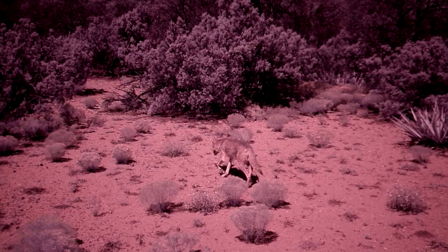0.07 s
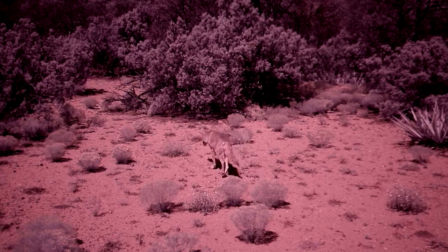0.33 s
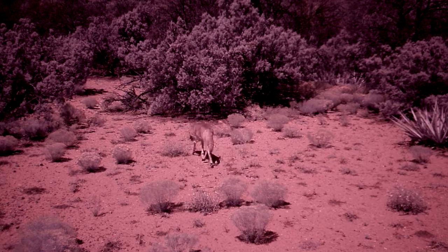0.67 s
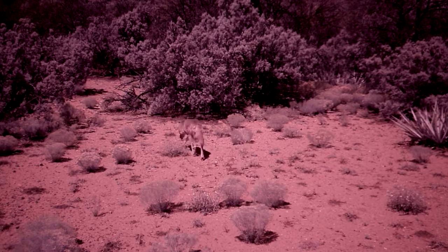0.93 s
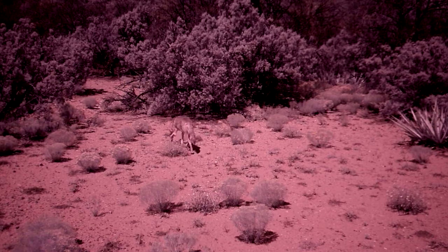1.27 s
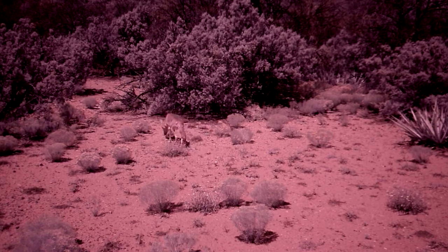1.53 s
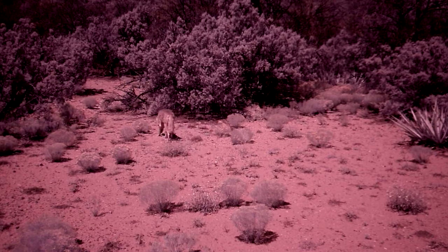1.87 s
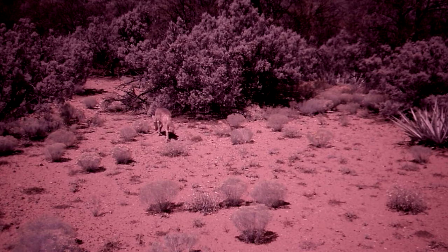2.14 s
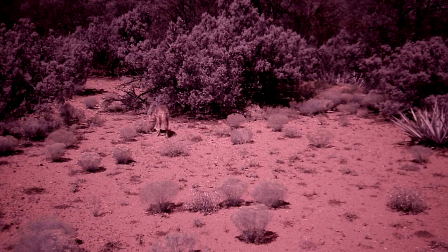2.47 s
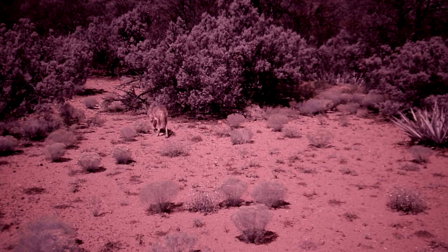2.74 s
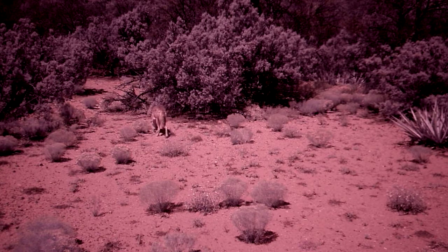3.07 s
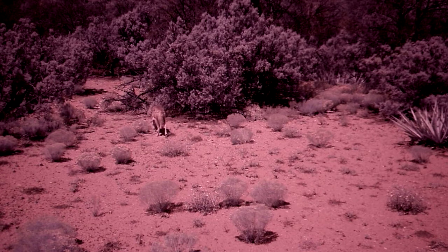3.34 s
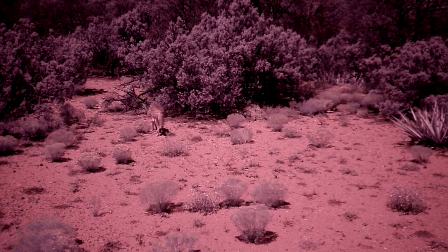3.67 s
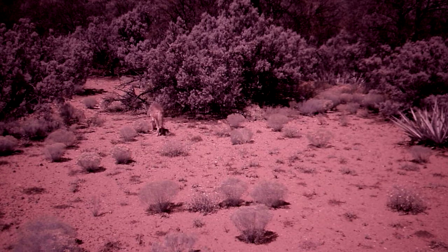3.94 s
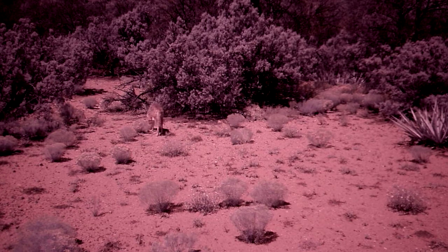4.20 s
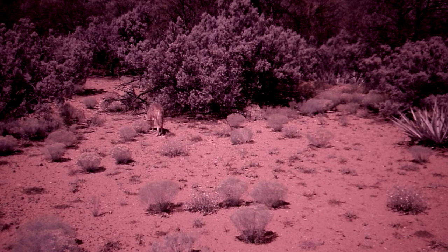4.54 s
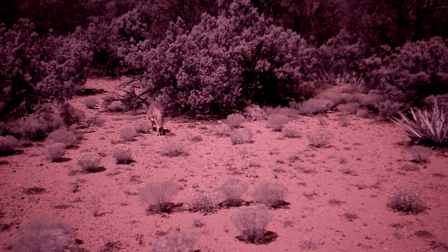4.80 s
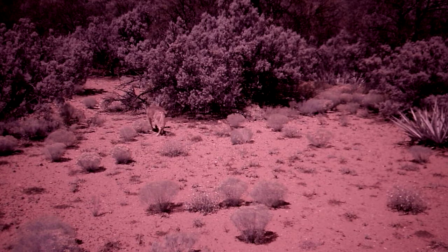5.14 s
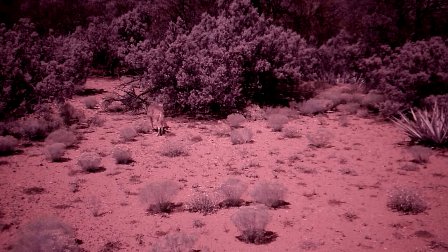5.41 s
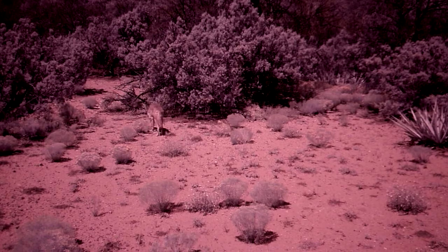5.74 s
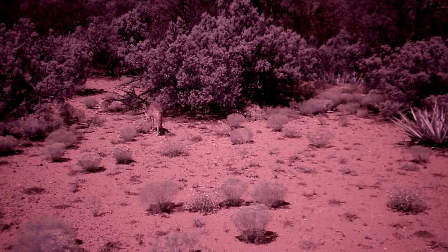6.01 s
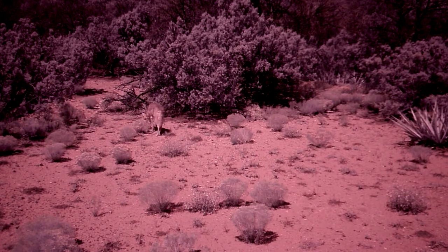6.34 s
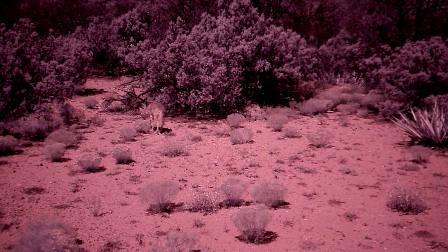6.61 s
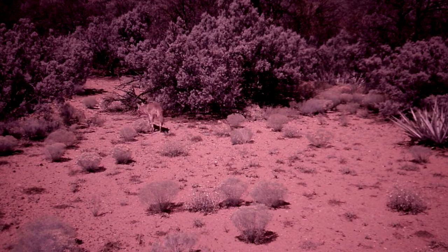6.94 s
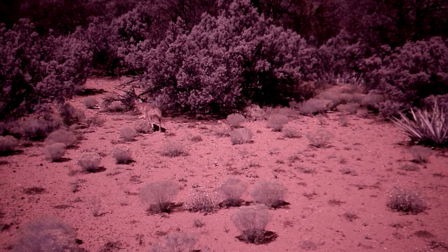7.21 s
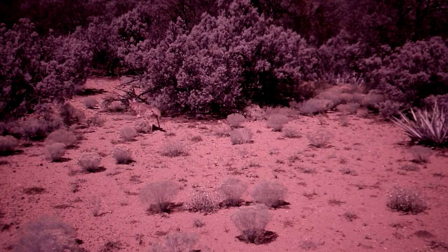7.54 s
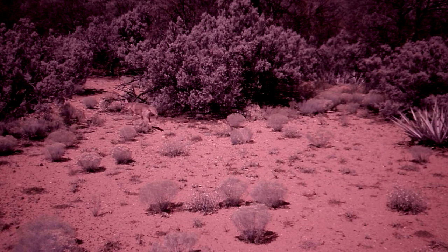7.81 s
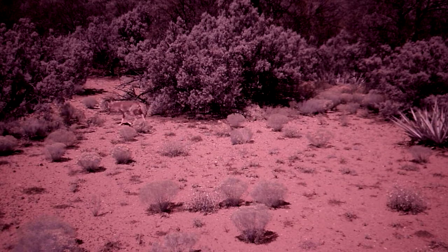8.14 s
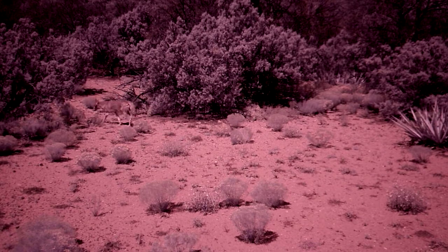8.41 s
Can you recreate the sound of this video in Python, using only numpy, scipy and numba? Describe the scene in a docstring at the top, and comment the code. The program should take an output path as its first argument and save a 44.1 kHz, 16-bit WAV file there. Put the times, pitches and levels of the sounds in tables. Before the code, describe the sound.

A deep, uneven rumble of wind starts after an instant of silence and keeps buffeting an unprotected microphone outdoors among desert bushes. Short gusts follow each other closely, each breaking in a dull pop as the sound overloads and dips. Faint, sputtering hiss follows the gusts. A single bright click sounds in the second half, and the wind blows on to the end.

```python
"""Desert wind on a bare microphone

Wind rises in the scrub. Eddies rumble and flutter at a small camera's microphone port, swelling
with gusts and sagging in brief lulls. Each gust breaks in a buffet that overloads the recorder,
whose gain drops at once with a dull pop. Thin hiss rides on every pressure swing; one dry click."""
import sys
import numpy as np
from scipy import signal
from scipy.fft import rfft, irfft
from scipy.io import wavfile
from scipy.ndimage import uniform_filter1d
from numba import njit

SR = 44100
rng = np.random.default_rng(int(sys.argv[2]) if len(sys.argv) > 2 else 0)


def put_to_file(sound):
    """Save the sound as 16-bit audio at rate SR, in the file named by the first command-line argument."""
    columns = np.atleast_2d(sound).T  # one column per channel
    safe = np.clip(columns, -1, 1)
    whole_steps = np.round(safe * 32767)
    wavfile.write(sys.argv[1], SR, whole_steps.astype(np.int16))


N = 377937
TIME = np.arange(N) / SR
CONTROL_TIME = TIME[::32]
CEILING = .69   # recorder overload, re full scale


# Wind strength between gusts: t/s, level/dB
WIND_LEVEL = [(0, -89), (.26, -79), (.37, -27.5), (.53, -20), (.85, -17), (1.55, -20.5), (2.3, -19),
              (3.05, -17), (3.75, -18.5), (4.0, -20.5), (4.6, -17.5), (5.2, -17), (5.65, -19), (6.3, -16.5),
              (7.1, -14.5), (7.7, -18), (8.25, -18), (8.57, -15)]
# Large-eddy spectrum: f/Hz, level/dB
RUMBLE_SPECTRUM = [(10, -5), (28, 2), (45, 0), (65, -1), (100, -6), (140, -12), (200, -34), (350, -55.5)]


def rumble(gust_db, lull_db, gust_share=.65, trim_db=1.5, split_hz=110, treble_follow=.33):
    """Large eddies heave at the port; smoother air rumbles deeper."""
    swing = steadied(noise(RUMBLE_SPECTRUM), span_s=.085) * flicker(spread_db=1.5, rate_hz=12)
    deep = signal.sosfiltfilt(signal.butter(2, split_hz, fs=SR, output="sos"), swing)
    upper = (swing - deep) * from_db(treble_follow * roughness_db())
    level_db = in_time(WIND_LEVEL) + gust_share * gust_db - lull_db + trim_db
    return from_db(level_db) * (deep + upper)


# Turbulence between gusts: t/s, level/dB
TURBULENCE_LEVEL = [(0, -110), (.28, -86), (.38, -38), (.66, -39), (.76, -22.5), (1.1, -34.5), (1.6, -29),
                    (2.0, -26.5), (2.55, -34), (3.05, -29.5), (3.65, -30), (4.4, -32), (5.5, -30.5),
                    (5.7, -35.5), (6.45, -35), (6.98, -33), (7.6, -39), (8.57, -41)]
# Small-eddy spectrum: f/Hz, level/dB
FLUTTER_SPECTRUM = [(60, -22.5), (130, 3), (200, -1.5), (280, -11.5), (400, -20.5), (560, -30),
                    (800, -40.5), (1400, -56.5)]


def flutter(gust_db, lull_db, lull_scale=1.35, trim_db=.2):
    """Small eddies arrive in packets and die further in a lull than large ones."""
    packets = flicker(spread_db=5.5, rate_hz=25) * noise(FLUTTER_SPECTRUM)
    level_db = in_time(TURBULENCE_LEVEL) + gust_db - lull_scale * lull_db + trim_db
    return from_db(level_db) * steadied(packets, span_s=.11)


def roughness_db():
    """Turbulence relative to its median."""
    level_db = in_time(TURBULENCE_LEVEL)
    return level_db - np.median(level_db)


# Gusts, each ending in a buffet: t/s, swell/dB, excess over ceiling/dB re ceiling
GUST_EVENTS = [(0.7158, 10.5, -20), (0.735, 7, -6), (0.9237, 12, -19), (1.018, 3.5, -19.5),
               (1.1538, 12, -19), (1.2802, 10, -21), (1.3778, 4.5, -24), (1.478, 10, -25), (1.4926, 11, -7),
               (1.6376, -5, -17), (1.7432, 7, -19), (1.8678, 9.0, -21), (1.993, 6.5, -20), (2.087, 9, -19),
               (2.2064, 7.5, -19.5), (2.3412, 6, -15), (2.414, 2, -20.5), (2.5457, 9, -9.5),
               (2.71, 9.5, -5), (2.8254, 6.0, -15), (2.868, -8, -15.5), (3.1063, 12.0, -16),
               (3.2706, 11.5, -20), (3.3525, 7.5, -19), (3.4161, 2.0, -17.5), (3.5317, 5, -19),
               (3.7179, 7.5, -20), (3.8274, 9.5, -21), (3.8636, 8, -17), (4.1263, 10.5, -20),
               (4.156, 5.5, -12), (4.3592, 3, -17), (4.538, 7.5, -21.5), (4.709, 9, 0.5),
               (4.8871, 5, -18.5), (4.9585, 3.0, -22), (5.0843, 6, -23), (5.201, 10, -8), (5.2954, 3, -19),
               (5.4735, 9.5, -7), (5.577, 11.5, -18.5), (5.7315, 5.5, -14.5), (5.8448, 11, -21.5),
               (6.036, 12.0, -13.5), (6.1276, 1.5, -22), (6.2663, 7.5, -18), (6.3311, 4.5, -19),
               (6.5084, 7.0, -21), (6.5763, 5.5, -18.5), (6.7693, -3, -9), (6.9252, 6, -21),
               (7.0016, 4.5, -19.5), (7.0521, 3.0, -19), (7.2549, 0.0, -21), (7.4148, 5.5, -10),
               (7.4686, 4.5, -21), (7.6458, 1, -11), (7.7194, 5, -20), (7.95, 8, -18.5), (8.1472, 3, -15.5),
               (8.1779, 5.5, -13.5), (8.3176, 0, -19), (8.373, 5.0, -7), (8.4, 12, -13),
               (8.5477, 11, -12.5)]


def gust_swell_db(build_s=.08, collapse_s=.021):
    """Gusts build, then collapse quickly; the strongest prevails."""
    swells = [db * bell(CONTROL_TIME - t, np.where(CONTROL_TIME < t, build_s, collapse_s))
              for t, db, _ in GUST_EVENTS]
    return np.interp(TIME, CONTROL_TIME, np.max(swells, axis=0))


def buffets(pressure, half_width_s=.0019, log_spread=.3, sharpening=1.05, lead_s=.0005):
    """Each buffet drives the present push or suction past the ceiling, more briefly in rough air."""
    out = pressure.copy()
    widths_s = half_width_s * from_db(-sharpening * roughness_db())
    for t, _, excess_db in GUST_EVENTS:
        at = int(t * SR)
        height = CEILING * (1 + from_db(excess_db))
        width_s = widths_s[at] * np.exp(log_spread * rng.standard_normal())
        # the rising bell crosses the ceiling lead_s before t
        crest_s = t - lead_s + width_s * np.sqrt(2 * np.log(height / CEILING))
        near = slice(*np.searchsorted(TIME, [crest_s - 4 * width_s, crest_s + 4 * width_s]))
        peak = height * np.sign(pressure[at])
        out[near] += bell(TIME[near] - crest_s, width_s) * (peak - out[near])
    return out


# Lulls: t/s, half-width/s, depth/dB
LULL_EVENTS = [(0.6, 0.025, 4.5), (0.94, 0.025, 8), (1.2, 0.036, 9.5), (1.411, 0.017, 5.5),
               (2.58, 0.02, 5.5), (3.14, 0.02, 8.5), (3.93, 0.066, 6.5), (4.22, 0.017, 5), (5.11, 0.035, 8),
               (6.4, 0.021, 5.5), (7.289, 0.014, 10), (7.51, 0.036, 9), (7.85, 0.041, 6),
               (8.08, 0.023, 6.5)]


def lull_depth_db():
    """The air briefly falls slack."""
    depth_db = sum(db * bell(CONTROL_TIME - t, width_s) for t, width_s, db in LULL_EVENTS)
    return np.interp(TIME, CONTROL_TIME, depth_db)


@njit
def gain_control(x, drop_ratio, ramps_s, hold_s=.00023, release_s=.018):
    """Overload clips; after hold_s the gain ramps down with a pop, then recovers."""
    out = np.empty(len(x))
    gain, step = 1.0, 0.0
    overloaded, ramp_left = 0, 0   # samples
    for i in range(len(x)):
        y = x[i] * gain
        overloaded = overloaded + 1 if abs(y) > CEILING and ramp_left == 0 else 0
        if overloaded > hold_s * SR:
            ramp_left = max(int(ramps_s[i] * SR), 1)
            step = gain * (1 - drop_ratio) / ramp_left
        if ramp_left > 0:
            gain -= step
            ramp_left -= 1
        gain += (1 - gain) / (release_s * SR)
        out[i] = min(max(y, -CEILING), CEILING)
    return out


# Hiss floor: t/s, level/dB
HISS_FLOOR_LEVEL = [(0, -105), (.32, -100), (.38, -64), (.48, -69), (.53, -43), (.57, -72.5), (3.9, -69),
                    (4.5, -67), (7.75, -58), (7.95, -49.5), (8.25, -46), (8.45, -64), (8.57, -53)]
# Hiss spectrum: f/Hz, level/dB
HISS_SPECTRUM = [(200, 4), (1000, 2.5), (2000, -1), (3500, -1.5), (5000, -1.5), (5500, -10)]


def hiss(swing, riding_db=-35.5):
    """Thin, sputtering hiss swells above its floor with each pressure swing."""
    floor = from_db(in_time(HISS_FLOOR_LEVEL))
    level = np.hypot(floor, from_db(riding_db) * swing)
    return level * flicker(spread_db=2, rate_hz=90) * noise(HISS_SPECTRUM)


def click(at_s=5.4233, step_db=-2, decay_s=.0038):
    """One dry, bright click: a step with an exponential tail on each side."""
    age_s = TIME - at_s
    return from_db(step_db) * .5 * np.sign(age_s) * np.exp(-np.abs(age_s) / decay_s)


def from_db(db):
    """Decibels to gain."""
    return 10 ** (np.asarray(db) / 20)


def in_time(rows):
    """Breakpoints interpolated to every sample."""
    return np.interp(TIME, *np.transpose(rows))


def bell(age, width):
    """Gaussian of height 1."""
    return np.exp(-.5 * (age / width) ** 2)


def noise(spectrum):
    """Coloured noise, rms 1."""
    hz, db = np.transpose(spectrum)
    bins_hz = np.arange(N // 2 + 1) * SR / N
    gain = from_db(np.interp(np.log(bins_hz + 1), np.log(hz), db))
    rolloff = 1 + (bins_hz / (2 * hz[-1])) ** 4
    x = irfft(rfft(rng.standard_normal(N)) * gain / rolloff, N)
    return x / x.std()


def flicker(spread_db, rate_hz):
    """Randomly wandering gain."""
    return from_db(spread_db * noise([(1, 0), (rate_hz, 0)]))


def steadied(x, span_s):
    """Signal divided by its running rms."""
    power = uniform_filter1d(x ** 2, int(span_s * SR))
    return x / np.sqrt(power + 1e-3)


def scene():
    """Pressure at the port: eddies level off at the ceiling, buffets exceed it."""
    gust_db, lull_db = gust_swell_db(), lull_depth_db()
    eddies = rumble(gust_db, lull_db) + flutter(gust_db, lull_db)
    limited = eddies / (1 + (eddies / CEILING) ** 8) ** (1 / 8)
    return buffets(limited)[None]


def record(dry, drop_db=-7, ramp_s=.00041, log_spread=.22, band_hz=5750, cutoff_hz=16000):
    """Gain drops pop; wind and hiss are band-limited, the click stays bright."""
    ramps_s = ramp_s * np.exp(log_spread * rng.standard_normal(N))   # fast cracks, slow knocks
    popped = gain_control(dry[0], float(from_db(drop_db)), ramps_s)
    band_limit = signal.ellip(10, .1, 80, band_hz, fs=SR, output="sos")
    top_cut = signal.butter(16, cutoff_hz, fs=SR, output="sos")
    narrow = signal.sosfilt(band_limit, popped + hiss(popped))
    return signal.sosfilt(top_cut, narrow + click())[None]


dry = scene()
out = record(dry)
put_to_file(out)
```